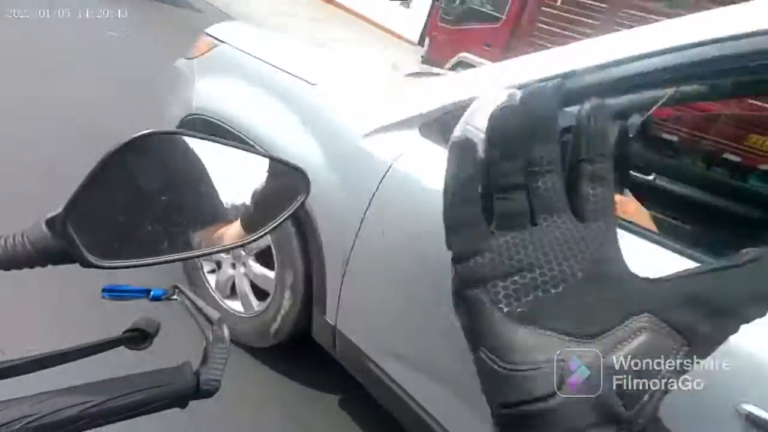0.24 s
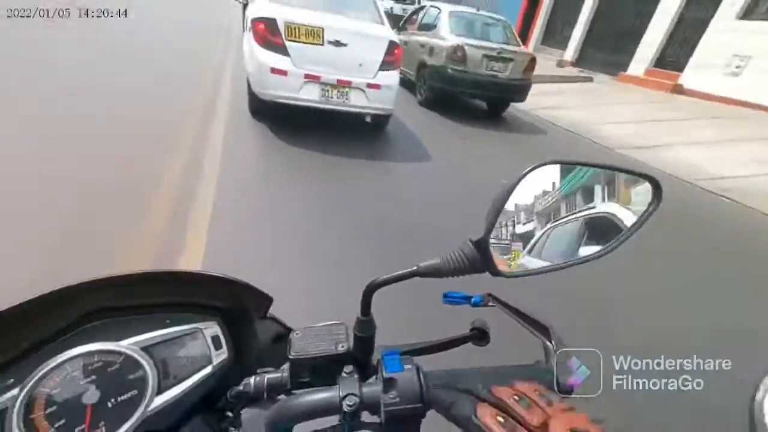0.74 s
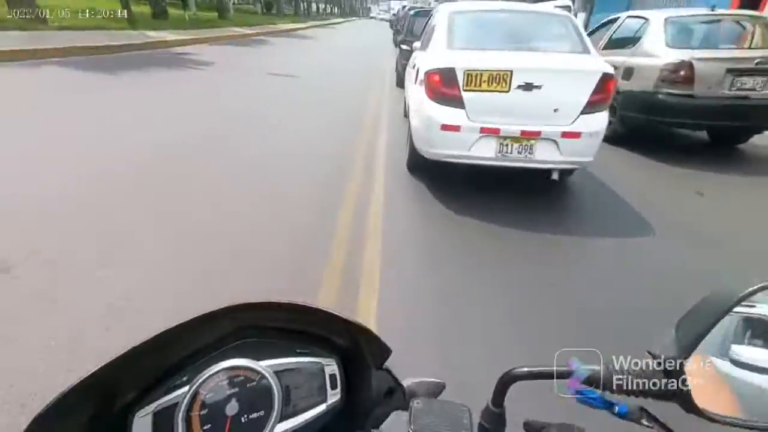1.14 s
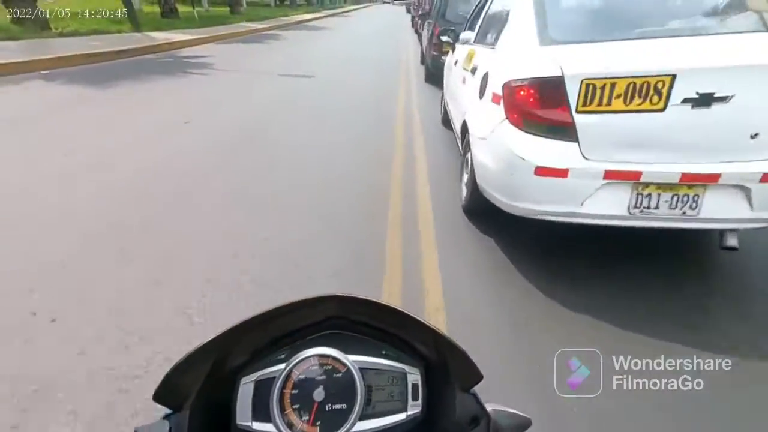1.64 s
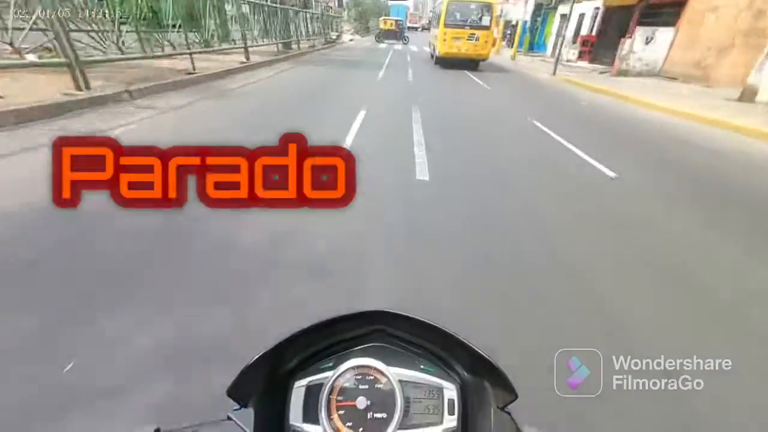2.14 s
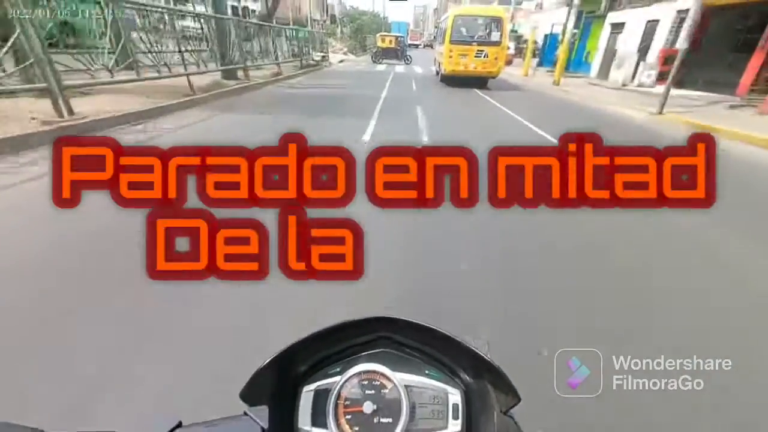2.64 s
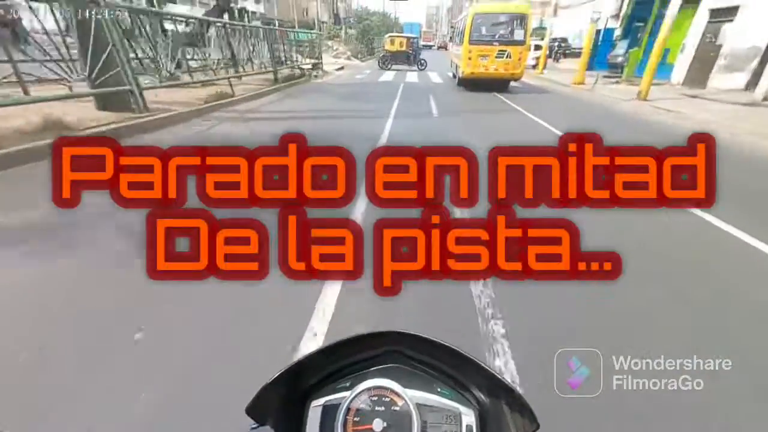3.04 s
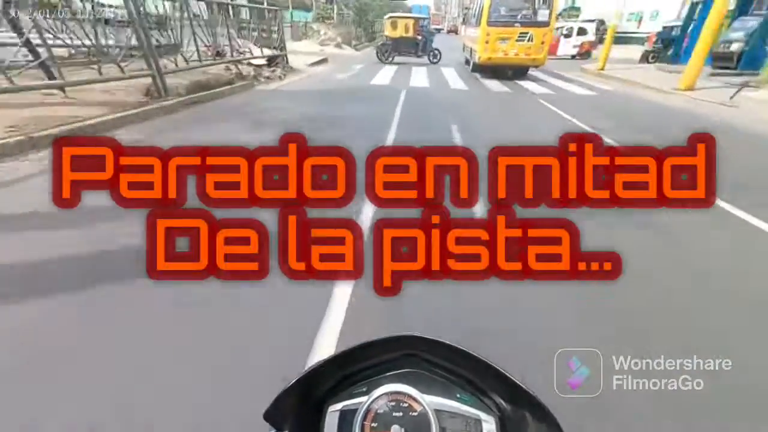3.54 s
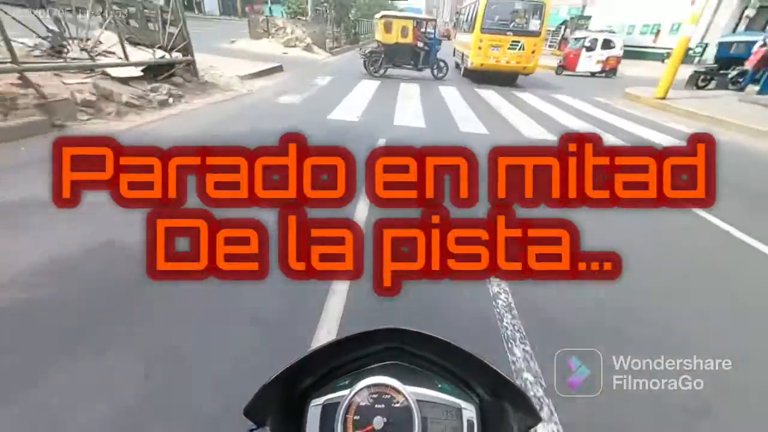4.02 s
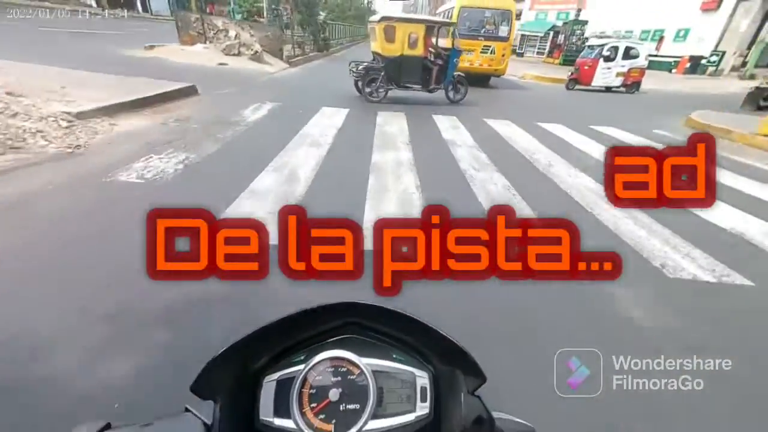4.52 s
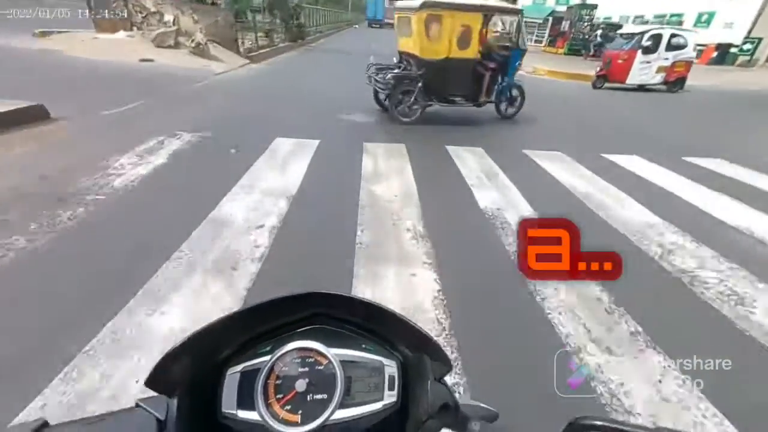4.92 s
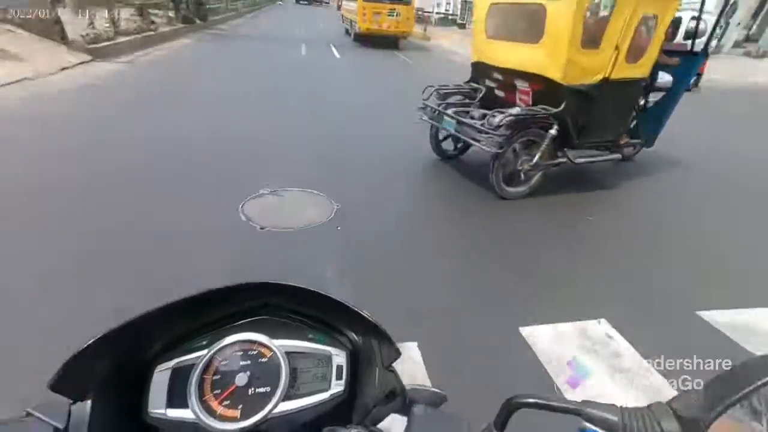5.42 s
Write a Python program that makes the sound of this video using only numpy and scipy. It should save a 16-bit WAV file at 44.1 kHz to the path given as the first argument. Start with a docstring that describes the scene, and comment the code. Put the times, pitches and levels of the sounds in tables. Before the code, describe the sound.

A small single-cylinder motorcycle idles, pulls away roaring, and gives one long piercing horn blast over city traffic before slowing down.

```python
"""A city street, heard from the rider's seat of a single-cylinder motorcycle that idles and pulls away.
Its disc horn gives one long blast: harmonics of a contact rate that sags as revs and supply voltage fall.
Engine pulses drive exhaust and housing resonances; filtered noise makes the roar, wind and frame rumble.
Damped noise bursts knock, a vehicle ahead drones upward as a harmonic sum, and house fronts return
the horn as faint delayed copies over a bed of coloured traffic noise."""
import sys
import numpy as np
from scipy import signal
from scipy.fft import rfft, irfft, next_fast_len
from scipy.io import wavfile
from scipy.ndimage import uniform_filter1d

SR = 44100
rng = np.random.default_rng(int(sys.argv[2]) if len(sys.argv) > 2 else 0)


def master_out(mix):
    """Clip the mix to full scale and print it as 16-bit PCM to the path in sys.argv[1]."""
    frames = np.transpose(np.atleast_2d(mix))
    ceiling = np.clip(frames, -1, 1)
    pcm = np.round(ceiling * 32767).astype(np.int16)
    wavfile.write(sys.argv[1], SR, pcm)


N = 250311
T = np.arange(N) / SR  # time (s)

# Traffic spectrum. Each row: frequency in Hz, relative level in dB.
TRAFFIC_SPECTRUM = [(35, -5), (60, -10), (190, -6.5), (350, -20.5), (627, -13.5), (931, -20.5), (1050, -29),
                    (1230, -2.5), (1420, -16), (1520, -15), (1830, -11.5), (2780, -31), (3670, -35),
                    (5710, -36), (15500, -42.5)]
TRAFFIC_DB, TRAFFIC_SWELL_DB = -58, 0.5  # mean level; spread of its slow wander

# Engine speed. Each row: time in seconds, firings per second.
FIRING_RATE = [(0, 11.5), (1.55, 11.7), (1.75, 23), (1.95, 37), (2.15, 38), (2.5, 42), (2.95, 46),
               (3.3, 40), (3.65, 34), (4.05, 28.7), (4.4, 25.5), (4.8, 21.4), (5.1, 21.9), (5.3, 22.6),
               (5.5, 21.7), (5.68, 21.6)]
# Levels of the ride. Each row: time in seconds, engine clatter and roar in dB, wind and frame rumble in dB,
# both before the offsets of the separate layers.
RIDE_LEVELS = [(0.28, -56, -54), (1.5, -58, -58), (1.6, -55.5, -52), (1.88, -46.5, -48), (1.93, -44, -39.5),
               (3.04, -44, -42), (3.22, -40.5, -41), (3.32, -43.5, -43.5), (4.54, -44, -43.5),
               (4.79, -48, -45.5), (5.56, -46.5, -44)]
# Exhaust swells as the bike takes load. Each row: centre in seconds, half length in seconds, rise in dB.
LOAD_SURGES = [(1.74, 0.05, 10.5), (2.022, 0.13, 13.5), (2.553, 0.21, 5.5), (2.966, 0.17, 9.5),
               (3.433, 0.24, 8), (5.603, .12, 4)]
# Low housing resonances, a hollow body near 1 kHz.
# Each row: centre in Hz, width of each of two passes in Hz, gain in dB.
HOUSING_LOW_MODES = [(255, 168, 0), (942.7, 70, 1), (1288, 210, -1.5), (1376, 54, 2), (1678, 145, -3.5),
                     (1932, 84, -7.5)]
# High housing resonances, a ticking ring near 3.6 kHz.
# Each row: centre in Hz, width of each of two passes in Hz, gain in dB.
HOUSING_HIGH_MODES = [(3175, 150, -4), (3614, 157, 5), (3680, 92, 4.5), (4160, 320, -3.5),
                      (4836, 140, -1.5), (5240, 570, -10)]
# Exhaust spectrum. Each row: frequency in Hz, relative level in dB.
EXHAUST_SPECTRUM = [(12, -21), (22, 6.5), (42, 3.5), (70, -12), (130, -12), (300, -30.5), (700, -53),
                    (2000, -75)]
# Wind and frame rumble spectrum. Each row: frequency in Hz, relative level in dB.
RUMBLE_SPECTRUM = [(25, -31), (60, -0.5), (100, 2.5), (145, 2), (200, -10.5), (280, -7.5), (330, -15),
                   (420, -13), (600, -20.5), (1200, -45), (4000, -56)]
# Intake roar and air hiss spectrum. Each row: frequency in Hz, relative level in dB.
ROAR_SPECTRUM = [(150, -11.5), (400, -2), (700, 0), (950, 3), (1060, -0.5), (1350, 5), (1520, -8.5),
                 (1800, -1.5), (2300, -7), (2750, -11), (4500, -10.5), (6500, -21.5), (9000, -34),
                 (15000, -40)]
FIRING_AT = 4.871  # the moment of one firing (s)
CLUTCH_S, CLUTCH_TIME_S = 2, 0.67  # the clutch starts to bite; time until it is home
EXHAUST_IDLE_DB, EXHAUST_RUNNING_DB = -44.5, -42.5  # before the load surges
VALVE_IDLE_DB, VALVE_SLOW_DB, VALVE_FAST_DB = -12, -8, -15  # against clatter: at idle, low and high revs
ALONGSIDE_DB, ALONGSIDE_S = 5.5, 0.58  # a car alongside throws the valve ticks back until the bike is past
CLATTER_DB, ROAR_DB, RUMBLE_DB = -1, -3, 1.08  # against the ride levels
AIR_DB = -2.5  # hiss of air and tyres against the intake roar, before their common filter

# Damped noise bursts: a few knocks early on, then single engine knocks near the firing rate.
# Each row: start in seconds, level in dB before the envelope, centre in Hz,
# width of each of two passes in Hz, decay time constant in seconds.
KNOCK_EVENTS = [(0.179, -39, 205, 150, 0.021), (0.18, -43.5, 1330, 250, .022),
                (1.957, -34, 1060, 585, 0.022), (4.965, -42, 3600, 250, 0.008),
                (5.058, -37, 3580, 250, 0.0089), (5.174, -44.5, 4050, 1700, 0.025),
                (5.463, -45.5, 3610, 290, .008), (5.508, -43, 4130, 100, 0.015),
                (5.556, -33, 800, 1000, 0.0022), (5.603, -34, 150, 150, 0.014),
                (5.608, -42, 3730, 700, 0.0052)]

# Horn partials on a full supply. Each row: multiple of the contact rate, level in dB against
# MIDDLE_DB or TOP_DB; the levels of multiples 1 and 8 come from the two time tables below.
FULL_PARTIALS = [(1, -14), (2, -25), (3, -20.5), (4, -34.5), (5, -22), (6, -19), (7, -26.5), (8, 0.5),
                 (9, -16), (10, -27.5), (11, -30.5), (12, -24.5), (13, -30), (14, -41), (15, -34),
                 (16, -40), (17, -39), (18, -42), (19, -41), (20, -37.5), (21, -43), (22, -41), (23, -30.5),
                 (24, -40), (25, -38), (26, -43), (27, -60.5), (28, -59), (29, -56), (30, -46), (31, -40),
                 (32, -52), (33, -55), (34, -49), (35, -55), (36, -61), (37, -53)]
# Horn partials on a sagging supply. Each row: multiple, level in dB, as above.
SAGGING_PARTIALS = [(1, -15), (2, -27.5), (3, -33), (4, -32), (5, -24), (6, -12), (7, -21.5), (8, 0),
                    (9, -14.5), (10, -25), (11, -30), (12, -19.5), (13, -33), (14, -36), (15, -36.5),
                    (16, -42), (17, -39.5), (18, -63), (19, -57), (20, -42), (21, -40), (22, -56),
                    (23, -37), (24, -36.5), (25, -33.5), (26, -37.5), (27, -44), (28, -63), (29, -59),
                    (30, -48), (31, -38), (32, -44), (33, -59), (34, -56), (35, -54), (36, -61), (37, -61)]
# Horn partials on a weak supply. Each row: multiple, level in dB, as above.
WEAK_PARTIALS = [(1, -13), (2, -37), (3, -22.5), (4, -43), (5, -26.5), (6, -27.5), (7, -29.5), (8, 0),
                 (9, -7), (10, -30), (11, -27.5), (12, -20.5), (13, -33), (14, -42), (15, -30), (16, -45),
                 (17, -58), (18, -47), (19, -43), (20, -35), (21, -33), (22, -52), (23, -38), (24, -40),
                 (25, -38.5), (26, -39), (27, -41), (28, -61), (29, -76), (30, -54), (31, -51), (32, -55),
                 (33, -49), (34, -57), (35, -60), (36, -62), (37, -65)]
# Disc tone, the eighth partial. Each row: time in seconds, level in dB before a small trim.
DISC_LEVEL = [(2.41, -26.5), (2.55, -25), (2.6, -30), (3.27, -29), (3.33, -32.5), (4.26, -27), (4.3, -32),
              (4.58, -28.5), (4.67, -28)]
# Diaphragm fundamental. Each row: time in seconds, level in dB before a small trim.
DIAPHRAGM_LEVEL = [(2.41, -40.5), (3.09, -43), (3.12, -45.5), (4.25, -42.5), (4.67, -41.5)]
# Contact rates on the weak supply, each held until the next.
# Each row: start in seconds, rate in Hz, change of the overtones in dB.
CONTACT_STEPS = [(3.98, 411.7, 0), (4.215, 409.2, 2), (4.268, 401, -1.8), (4.51, 402.2, 2.5)]
HORN_ON, HORN_OFF = 2.384, 4.689  # (s)
HORN_HZ, START_FLAT_HZ, START_S = 420.5, 7, .008  # full-supply rate; initial flatness and its time constant
SAG_FROM_S, SAG_HZ_PER_S = 3.04, 5.8
MIDDLE_DB, TOP_DB = -29.5, -30  # reference levels of partials 2-12 and of those above
RING_HZ, RING_DB = 3576, -36.5  # free ring of the disc on a full supply
RING_FALL_HZ_PER_HZ, RING_FADE_HZ = 21.16, 5.4  # its fall and fade as the contact rate drops
RASP_DB, SIZZLE_DB = -44.5, -61  # blow noise around the disc tone (full supply) and in the treble
RATTLE_DB, RATTLE_WEAK_DB = -50, -45.5  # buzz along with the horn: full or sagging supply, weak supply
ECHO_DB = -10.5  # gain on the echo sum

# Drone of the vehicle ahead. Each row: multiple of its firing rate, relative level in dB.
DRONE_ORDERS = [(1, -3), (2, -12.5), (3, -17), (4, -11.5), (5, -16.5)]
AHEAD_S, AHEAD_HZ, AHEAD_DB = 5.1, 56.85, -38.5  # when nearest: time, firing rate, gain
AHEAD_HZ_PER_S, AHEAD_NEAR_S = 5.2, .9  # rise of its firing rate; half the time it is in earshot

TOP_HZ, DC_OFFSET = 15600, .0145  # treble limit; constant offset of the signal (full scale is one)


def undb(db):
    """Amplitude gain is ten to the power of decibels over twenty."""
    return 10 ** (np.asarray(db) / 20)


def unit(x):
    """Normalisation: dividing by the root mean square gives unit rms."""
    return x / np.sqrt(np.mean(x ** 2) + 1e-18)


def curves(table):
    """Linear interpolation: each column of a table becomes a signal in time."""
    s, *columns = np.transpose(table)
    return [np.interp(T, s, c) for c in columns]


def noise():
    """White noise: independent Gaussian samples have a flat spectrum."""
    return rng.standard_normal(N)


def walk(rate):
    """Smooth random modulation: held Gaussian steps, averaged twice, with a spread near one."""
    k = int(SR / rate)
    steps = np.repeat(rng.standard_normal(N // k + 1), k)
    return 1.32 * uniform_filter1d(uniform_filter1d(steps, k), k)[:N]


def swell(s, half):
    """Gaussian envelope: a smooth rise and fall around a moment."""
    return np.exp(-((T - s) / half) ** 2)


def ring(x, hz, width):
    """Simple resonance: a two-pole peak with unit gain at its centre."""
    return signal.lfilter(*signal.iirpeak(hz, hz / width, fs=SR), x)


def body(x, modes):
    """Modal superposition: parallel resonances, each passed twice for steep sides."""
    return sum(undb(db) * ring(ring(x, hz, width), hz, width) for hz, width, db in modes)


def colour(x, points):
    """Minimum-phase filtering: the folded cepstrum yields a causal filter; the output has unit rms."""
    size = next_fast_len(N + SR, real=True) // 2 * 2
    hz, db = np.transpose(points)
    f = np.arange(size // 2 + 1) * SR / size
    log_gain = np.log(undb(np.interp(np.log(f + 1), np.log(hz), db)))
    cepstrum = irfft(log_gain)
    cepstrum[1:size // 2] *= 2
    cepstrum[size // 2 + 1:] = 0
    response = np.exp(rfft(cepstrum))
    return unit(irfft(rfft(x, size) * response)[:N])


def steady(x, span=0.22):
    """Level equalisation: dividing by short-time rms removes the effect of pulse rate."""
    return x / np.sqrt(np.abs(uniform_filter1d(x ** 2, int(span * SR))) + 1e-12)


def strokes(cycle, offset, scatter_db):
    """Periodic impulses: one click of uneven force whenever the cycle passes a given point."""
    at = np.flatnonzero(np.diff(np.floor(cycle - offset)) > 0)
    clicks = np.zeros(N)
    clicks[at] = undb(scatter_db * rng.standard_normal(512)[:len(at)])
    return clicks


def fade(x, decay):
    """Exponential relaxation: a one-pole filter gives every click a decaying tail."""
    return signal.lfilter([1], [1, -np.exp(-1 / (decay * SR))], x)


def traffic():
    """Diffuse sources: many distant ones sum to coloured noise with a slowly wandering level."""
    return undb(TRAFFIC_DB + TRAFFIC_SWELL_DB * walk(1.73)) * colour(noise(), TRAFFIC_SPECTRUM)


def engine_blows(rate):
    """Cyclic impact: piston and valve blows recur at fixed points of the firing cycle."""
    cycle = np.cumsum(rate) / SR
    cycle += .012 * walk(12) - np.interp(FIRING_AT, T, cycle)
    firing = strokes(cycle, 0, scatter_db=1.5)
    # the crank turns twice for each firing, so a weaker blow falls near half the cycle
    piston = firing + .25 * strokes(cycle, .52, scatter_db=2)
    tappets = firing + .25 * strokes(cycle, .4, scatter_db=3)
    tappets = tappets + .3 * strokes(cycle, .68, scatter_db=3)
    return piston, tappets


def exhaust(piston, rate):
    """Pulsed flow: gas puffs sound the firing rate, mixed with turbulent noise."""
    level_db = np.interp(rate, [12, 22], [EXHAUST_IDLE_DB, EXHAUST_RUNNING_DB])
    level_db = level_db + sum(db * swell(s, half) for s, half, db in LOAD_SURGES)
    # an open throttle turns the loose throb into a firm note
    firm = np.interp(level_db, [-45, -34], [.55, .85])
    pulses = piston - uniform_filter1d(piston, SR // 6)  # without their local mean
    puffs = steady(colour(pulses, EXHAUST_SPECTRUM))
    turbulence = colour(noise(), EXHAUST_SPECTRUM)
    return undb(level_db) * (np.sqrt(firm) * puffs + np.sqrt(1 - firm) * turbulence)


def rumble(piston, beat):
    """Forced vibration and noise: filtered blows and pulsing coloured noise sound as frame and wind."""
    shaking = steady(colour(piston, RUMBLE_SPECTRUM))
    gusts = undb(0.41 * walk(20))
    wind = gusts * steady(colour(noise() * beat, RUMBLE_SPECTRUM))
    return 0.32 * shaking + 0.89 * wind


def intake_roar(beat):
    """Modulated turbulence: intake noise surges with the blows below an even hiss of air and tyres."""
    low = signal.butter(3, 2200, fs=SR, output="sos")
    high = signal.butter(3, 2200, "high", fs=SR, output="sos")
    surge = signal.sosfilt(low, steady(noise() * beat))
    air = signal.sosfilt(high, noise())
    return steady(colour(surge + undb(AIR_DB) * air, ROAR_SPECTRUM)) * undb(1.0 * walk(16))


def motorcycle():
    """Source and resonator: one train of blows drives exhaust, housing, frame and intake."""
    rate, = curves(FIRING_RATE)
    clatter_db, rumble_db = curves(RIDE_LEVELS)
    valve_db = clatter_db + np.interp(rate, [12, 22, 36], [VALVE_IDLE_DB, VALVE_SLOW_DB, VALVE_FAST_DB])
    valve_db = valve_db + ALONGSIDE_DB * swell(0, ALONGSIDE_S)
    piston, tappets = engine_blows(rate)
    # the blows are soft at idle and harder once the engine is in gear
    in_gear = np.clip((T - CLUTCH_S) / CLUTCH_TIME_S, 0, 1)
    force = .8 + in_gear * np.interp(rate, [27, 37], [2.2, 1.0])
    beat = 1 + 1.2 * force * uniform_filter1d(fade(piston, decay=.007), SR // 160)
    tick = 1 + .75 * force * uniform_filter1d(fade(tappets, decay=.007), SR // 400)
    clatter = steady(body(noise() * beat, HOUSING_LOW_MODES))
    valves = steady(body(noise() * tick, HOUSING_HIGH_MODES))
    out = exhaust(piston, rate)
    out = out + undb(rumble_db + RUMBLE_DB) * rumble(piston, beat)
    out = out + undb(clatter_db + CLATTER_DB) * clatter
    out = out + undb(valve_db) * valves
    return out + undb(clatter_db + ROAR_DB) * intake_roar(beat)


def knocks():
    """Damped bursts: a few knocks early on, then single engine knocks near the firing rate."""
    out = np.zeros(N)
    for s, db, hz, width, decay in KNOCK_EVENTS:
        age = np.maximum(T - s, 0)
        envelope = np.minimum(age / 0.0038, 1) * np.exp(-age / decay)
        out += undb(db) * unit(body(noise(), [(hz, width, 0)])) * envelope
    return out


def contact():
    """Self-interrupting contact: its rate settles, sags with the supply, then jumps between held rates."""
    hz = HORN_HZ - START_FLAT_HZ * np.exp(-np.maximum(T - HORN_ON, 0) / START_S)
    hz = hz - SAG_HZ_PER_S * np.maximum(T - SAG_FROM_S, 0)
    bite_db = np.zeros(N)  # change of the overtones
    for s, held_hz, db in CONTACT_STEPS:
        hz = np.where(T < s, hz, held_hz)
        bite_db = np.where(T < s, bite_db, db)
    return uniform_filter1d(hz, size=SR // 70), uniform_filter1d(bite_db, size=SR // 70)


def horn_partials(hz, bite_db, sag, phase):
    """Harmonic series: periodic blows sound multiples of the contact rate, the eighth being the disc tone."""
    disc_db, = curves(DISC_LEVEL)
    diaphragm_db, = curves(DIAPHRAGM_LEVEL)
    # the high partials feel the failing supply first
    sag_high = np.interp(hz, [402, 409, 418.5, 420], [2, 1, 1, 0])
    tone = np.zeros(N)
    for (k, full), (_, sagging), (_, weak) in zip(FULL_PARTIALS, SAGGING_PARTIALS, WEAK_PARTIALS):
        supply_db = [full, sagging, weak]
        # passing reflections make each partial swell and fade by itself
        if k == 8:
            db = disc_db + 0.88 + 0.75 * walk(16)
        elif k == 1:
            db = diaphragm_db - .3 + 0.44 * walk(14)
        elif k <= 12:
            db = MIDDLE_DB + bite_db + np.interp(sag, [0, 1, 2], supply_db) + 1.8 * walk(12)
        else:
            db = TOP_DB + bite_db + np.interp(sag_high, [0, 1, 2], supply_db) + 2.4 * walk(11)
        tone += np.sqrt(2) * undb(db) * np.sin(k * phase + 2 * np.pi * rng.random())
    return tone


def free_ring(hz):
    """Free vibration: irregular blows leave the disc ringing, as a randomly modulated tone."""
    drop_hz = HORN_HZ - hz
    ring_phase = 2 * np.pi * np.cumsum(RING_HZ - RING_FALL_HZ_PER_HZ * drop_hz) / SR
    ringing = (walk(95) + 1j * walk(95)) * np.exp(1j * ring_phase)
    return undb(RING_DB) * np.exp(-(drop_hz / RING_FADE_HZ) ** 2) * ringing.real


def horn_noise(sag, phase):
    """Impact noise: pulsing noise rasps and sizzles through resonances, and an even rattle buzzes along."""
    blows = noise() * (1 + 0.23 * np.cos(phase))
    rasp = undb(RASP_DB - 0.73 * sag) * unit(body(blows, [(3390, 470, 0)]))
    rattle_db = np.interp(sag, [1, 2], [RATTLE_DB, RATTLE_WEAK_DB])
    rattle = undb(rattle_db) * unit(body(noise(), HOUSING_HIGH_MODES))
    treble_modes = [(6940, 2100, 0), (10000, 1200, 0.5), (12900, 970, -2)]
    sizzle = undb(SIZZLE_DB) * unit(body(blows, treble_modes))
    return rasp + rattle + sizzle


def horn():
    """Forced vibration: an armature hammers a disc, and the contact beats less evenly on a weak supply."""
    hz, bite_db = contact()
    # state of the supply: 0 full, 1 sagging, 2 weak
    sag = np.interp(hz, [402, 409, 415.5, 420], [2, 1, 1, 0])
    jitter_hz = (0.085 + 0.246 * sag) * walk(45) + 0.46 * walk(400)
    phase = 2 * np.pi * np.cumsum(hz + jitter_hz) / SR
    attack = np.clip((T - HORN_ON) / .008, 0, 1)
    release = np.exp(-np.maximum(T - HORN_OFF, 0) / .004)
    sound = horn_partials(hz, bite_db, sag, phase) + free_ring(hz) + horn_noise(sag, phase)
    return attack * release * sound


def street(x, count=48, longest=0.31, t60=0.95, doppler=.05):
    """Reflection and Doppler shift: echoes from fronts and cars ahead come back sharp, those behind flat."""
    out = np.zeros(N)
    for lag, bearing in zip(np.linspace(.03, longest, count), rng.uniform(-0.7, 1, count)):
        delay = lag + doppler * bearing * (HORN_OFF - T)
        echo = np.interp(T - np.maximum(delay, .004), T, x, left=0)
        out += np.exp(-np.log(1000) * lag / t60) * echo
    # air and rough walls take the treble out
    return signal.sosfilt(signal.butter(2, 5000, fs=SR, output="sos"), out) / np.sqrt(count)


def vehicle_ahead():
    """Harmonic drone: exhaust orders follow a slowly rising firing rate as the vehicle comes into earshot."""
    hz = AHEAD_HZ + AHEAD_HZ_PER_S * (T - AHEAD_S)
    phase = 2 * np.pi * np.cumsum(hz * (1 + .005 * walk(10))) / SR
    drone = np.zeros(N)
    for k, db in DRONE_ORDERS:
        drone += undb(db + 1.8 * walk(6)) * np.sin(k * phase + 2 * np.pi * rng.random())
    return undb(AHEAD_DB) * swell(AHEAD_S, AHEAD_NEAR_S) * drone


def scene():
    """Superposition: pressures of bike, horn, echoes, traffic, vehicle ahead and a faint hiss add."""
    blast = horn()
    echoes = undb(ECHO_DB) * street(blast)
    hiss = undb(-71.0) * noise()
    return (traffic() + motorcycle() + knocks() + blast + echoes + vehicle_ahead() + hiss)[None]


def record(dry):
    """Band limiting: the converter cuts the top of the treble and sits slightly off zero."""
    low_pass = signal.ellip(10, .2, 80, TOP_HZ, fs=SR, output="sos")
    return signal.sosfilt(low_pass, dry) + DC_OFFSET


dry = scene()
out = record(dry)
master_out(out)
```